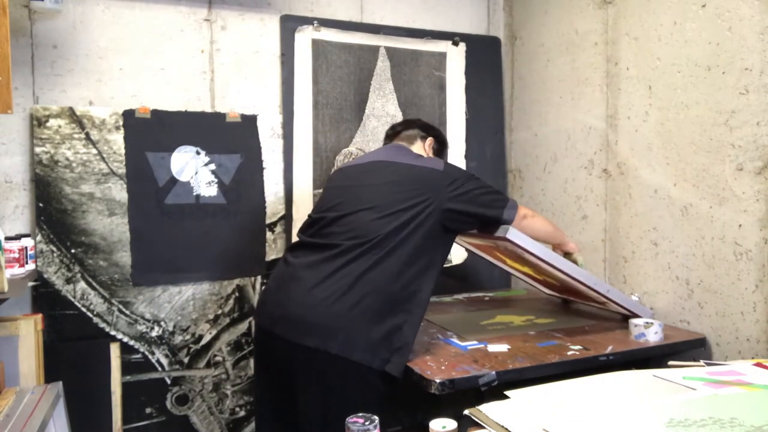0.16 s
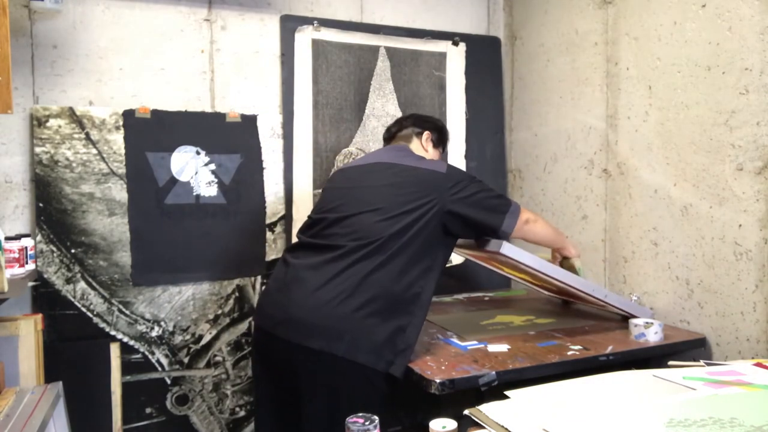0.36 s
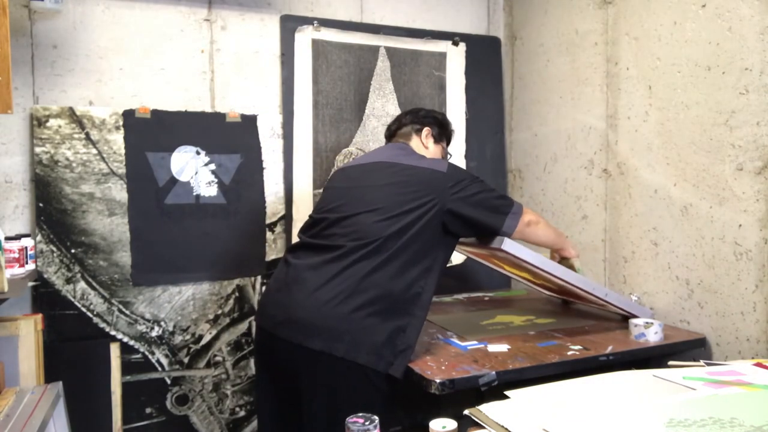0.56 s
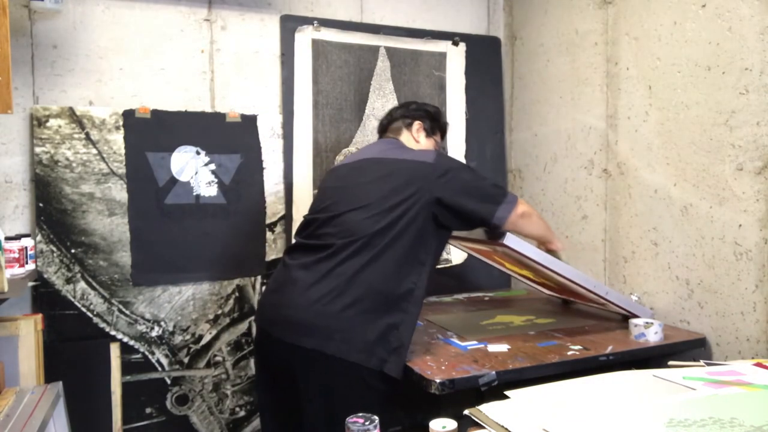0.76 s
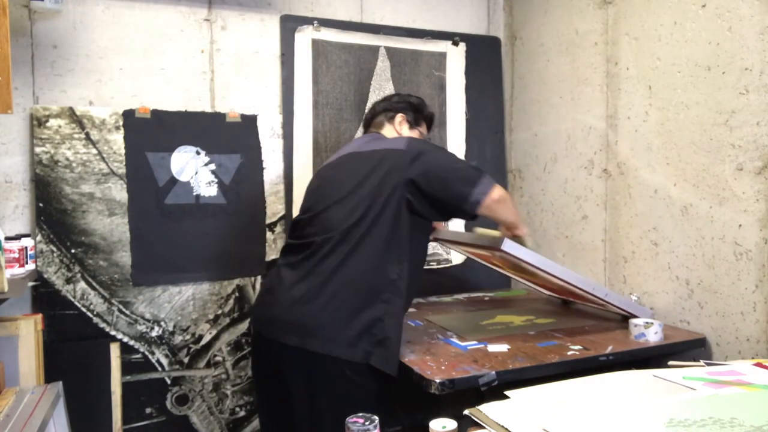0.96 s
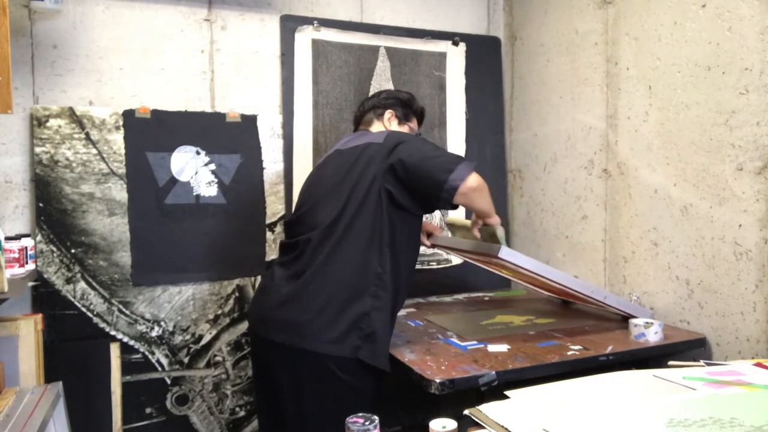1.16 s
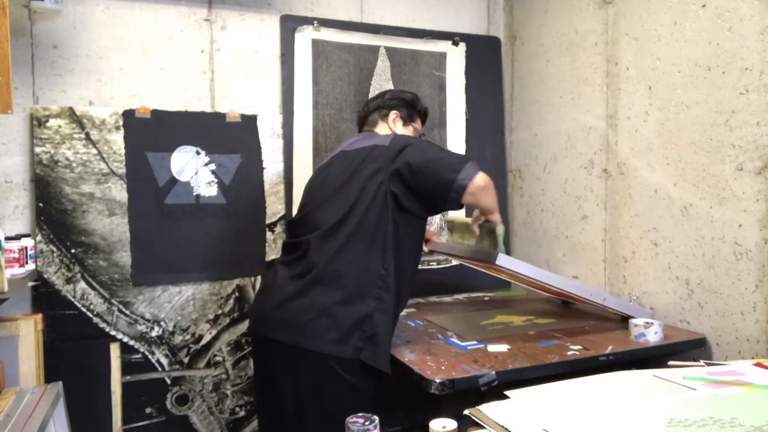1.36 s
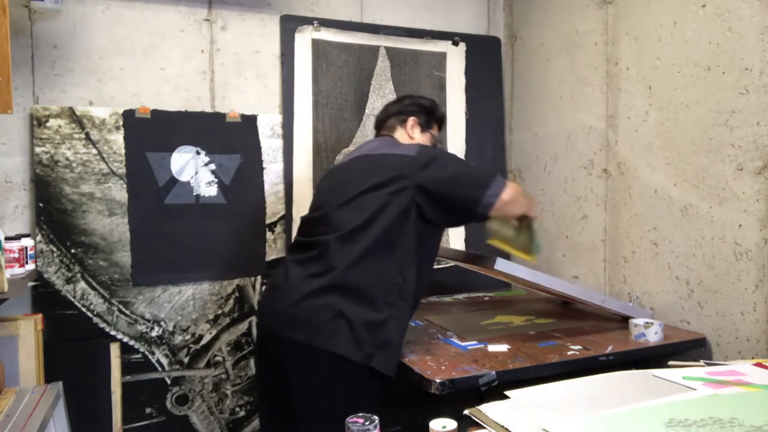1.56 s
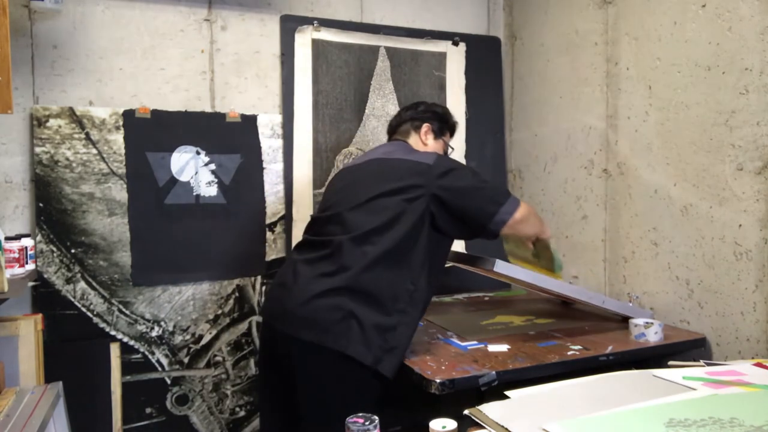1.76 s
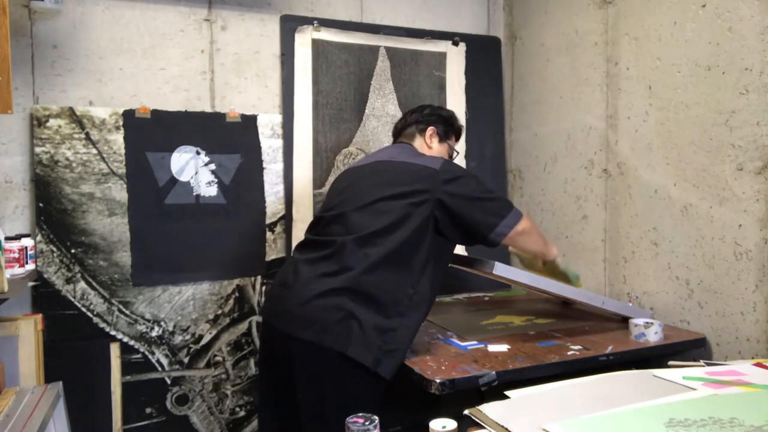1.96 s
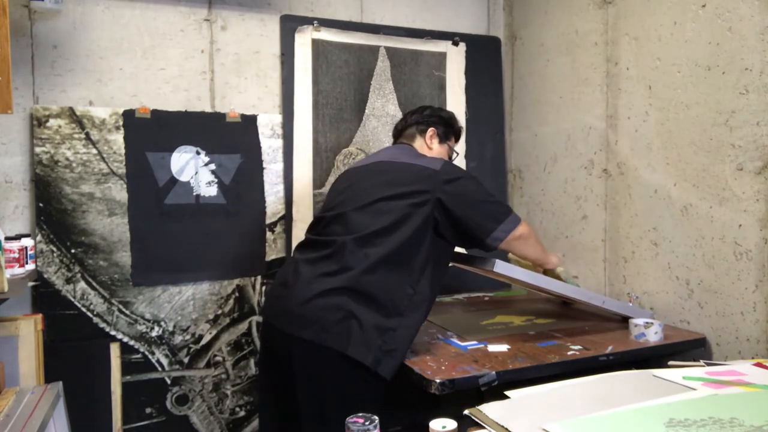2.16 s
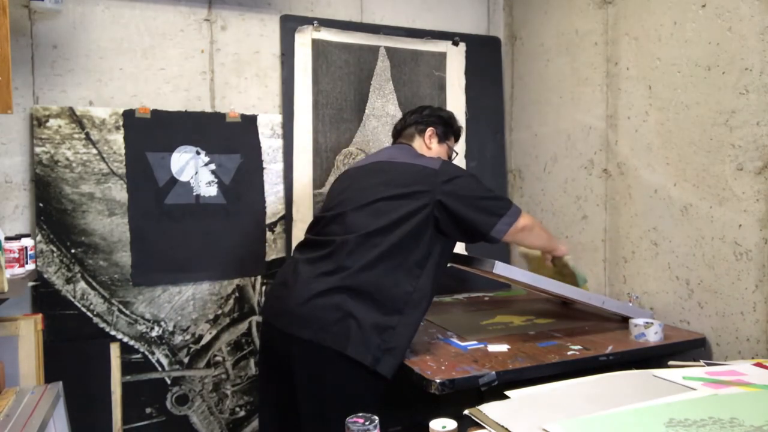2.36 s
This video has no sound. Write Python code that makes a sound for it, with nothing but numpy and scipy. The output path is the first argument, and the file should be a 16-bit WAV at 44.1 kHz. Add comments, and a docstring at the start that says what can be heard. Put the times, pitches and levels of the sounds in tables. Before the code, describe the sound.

A squeegee scrapes once across a printing screen, then two loud wooden knocks follow.

```python
"""A low mains hum hangs in a small concrete studio. After a small click, a squeegee is drawn
once across a printing screen: the blade hisses and scuffs over the taut mesh, and the weave
sings a rough note that rises and falls with the blade's speed. The stroke fades away.
Then the squeegee is set down against the frame with two loud wooden knocks,
each a crack of contact, a ring of the frame and a thump of the table."""
import sys
import numpy as np
from scipy import signal
from scipy.fft import rfft, irfft
from scipy.io import wavfile

SR = 44100
rng = np.random.default_rng(int(sys.argv[2]) if len(sys.argv) > 2 else 0)


def output_pcm(signal):
    """Save a mono or channel-first signal as 16-bit PCM at the path in sys.argv[1].

    Samples are clipped to [-1, 1] before scaling.
    """
    pcm = np.clip(np.atleast_2d(signal).T, -1, 1) * 32767
    wavfile.write(sys.argv[1], SR, np.round(pcm).astype(np.int16))


N = 105840
T = np.arange(N) / SR
HZ = np.maximum(np.arange(N // 2 + 1) * SR / N, 1)
AGE = np.arange(SR // 2) / SR   # seconds since an event
ROOM_BUILD_S = 0.0041   # attack of the room's reverb


def from_db(db):
    """Decibels to gain."""
    return 10 ** (np.asarray(db) / 20)


def rms_one(x):
    """Scale to unit level."""
    return x / np.sqrt(np.mean(x ** 2) + 1e-20)


def in_time(rows):
    """A control curve at every sample."""
    return np.interp(T, *np.transpose(rows))


def at_hz(points, hz):
    """Read a table on a log-frequency axis."""
    freqs, values = np.transpose(points)
    return np.interp(np.log(hz), np.log(freqs), values)


def noise(gain, size=N):
    """Unit noise with the given gain at each frequency."""
    gain = np.interp(np.arange(size // 2 + 1) * SR / size, HZ, gain)
    return rms_one(irfft(rfft(rng.standard_normal(size)) * gain, size))


def coloured(points):
    """Unit noise shaped by an EQ curve in dB."""
    return noise(from_db(at_hz(points, HZ)))


def drift(rate):
    """A smooth random wobble of unit level, mostly slower than `rate` Hz."""
    pole = np.exp(-2 * np.pi * rate * 8 / SR)
    white = rng.standard_normal(N // 8 + 2002)
    slow = signal.lfilter([1], [1, -2 * pole, pole * pole], white)[2000:]
    return np.interp(np.arange(N) / 8, np.arange(len(slow)), rms_one(slow))


def envelope(attack, t60, hold=0):
    """Straight attack, hold, exponential release."""
    release = np.exp(-np.log(1000) * np.maximum(AGE - attack - hold, 0) / t60)
    return np.clip(AGE / attack, 0, 1) * release


def mode(hz, t60, attack):
    """One dying sine."""
    return envelope(attack, t60) * np.sin(2 * np.pi * hz * AGE)


def placed(events):
    """Lay (start in seconds, sound) pairs on the timeline."""
    out = np.zeros(N + SR)
    for start, sound in events:
        out[int(start * SR):int(start * SR) + len(sound)] += sound
    return out[:N]


# The hum's partials. Each row: frequency in Hz, level in dB.
HUM_PARTIALS = [(59.4, -58.5), (119.8, -57.5), (178.5, -66), (239.2, -62.5), (294.8, -59), (355, -71),
                (1001.8, -74), (1473, -78)]
# Room tone EQ. Each row: frequency in Hz, gain in dB.
AIR_EQ = [(20, -8), (32, -19), (44, -12.5), (60, -24.5), (90, -3), (150, -7), (205, -12.5), (275, -6.5),
          (330, -7.5), (400, -10.5), (600, -12), (1000, -17), (1250, -18), (2000, -22.5), (3600, -25.5),
          (5000, -32.5), (9000, -36), (15500, -44.5)]
AIR_DB, HUM_WAVER_DB = -58, 1.8

def studio():
    """The bed: room air and a wavering mains hum."""
    hum = sum(from_db(db + HUM_WAVER_DB * drift(2.2)) * np.sin(2 * np.pi * (hz * T + rng.random()))
              for hz, db in HUM_PARTIALS)
    return np.sqrt(2) * hum + from_db(AIR_DB) * coloured(AIR_EQ)


# The rustle's fader. Each row: time in seconds, level in dB.
RUSTLE_FADER = [(0, -56.5), (.06, -59), (.15, -66), (.25, -63.5), (.36, -80)]
# Its EQ. Each row: frequency in Hz, gain in dB.
RUSTLE_EQ = [(500, 3), (1500, 0.5), (4000, -2), (9000, -8), (15000, -18)]

def handling():
    """A faint rustle of handling, gone when the stroke begins."""
    return coloured(RUSTLE_EQ) * from_db(in_time(RUSTLE_FADER)) * (T < RUB_FADER[0][0])


# The blade's catches. Each row: start in seconds, hold in seconds, release T60 in seconds,
# level in dB, centre in Hz, width in Hz.
SCUFF_CUES = [(.183, 0.018, 0.35, -47, 432, 106), (.604, 0.011, 0.18, -40, 2150, 330),
              (.605, 0.012, 0.12, -51.5, 4070, 550), (0.594, 0.013, 0.33, -46.5, 805, 137),
              (0.605, 0.01, 0.26, -44.5, 1410, 700), (0.619, 0.0084, 0.53, -44, 292, 130),
              (0.712, 0.027, 0.21, -52, 1550, 200), (.895, 0.05, 0.21, -49.5, 860, 448.7),
              (0.989, 0.044, 0.067, -44, 230, 88.4), (1.038, .05, 0.31, -56, 9500, 900),
              (1.139, .02, 0.097, -56, 3800, 603), (1.196, 0.016, 0.53, -45, 336, 165),
              (1.261, 0.02, 0.13, -56.5, 3700, 500), (1.375, 0.013, 0.13, -57, 820, 500),
              (2.182, 0.026, 0.11, -61, 7000, 5030), (2.191, .014, .15, -49.5, 2440, 1010)]

def scuffs(attack=0.0026):
    """Short resonant rasps where the blade grips."""
    rasps = []
    for start, hold, t60, db, hz, width in SCUFF_CUES:
        band = noise(1 / (1 + ((HZ - hz) / (width * 0.55)) ** 2), size=len(AGE))
        rasps.append((start, from_db(db) * envelope(attack, t60, hold) * band))
    return placed(rasps)


# The rubbing hiss's fader. Each row: time in seconds, level in dB.
RUB_FADER = [(.45, -88), (.49, -59.5), (.58, -53.5), (.64, -50), (.8, -45), (.94, -43.5), (1.06, -44.5),
             (1.12, -48), (1.17, -49.5), (1.215, -55), (1.28, -53.5), (1.34, -56.5), (1.39, -60),
             (1.44, -70), (1.5, -93)]
# EQs of the hiss and of the mesh as a drumhead. Each row: frequency in Hz, gain in dB.
RUB_EQ = [(300, -17), (520, -6.5), (800, -4), (1100, -5.5), (1400, -4.5), (2100, -4.5), (2700, -1.5),
          (3800, -2.5), (5000, -9.5), (6000, -7.5), (8500, -12.5), (10500, -17), (13000, -21.5),
          (15500, -27)]
DRUM_EQ = [(120, -37), (200, -3), (290, -1), (390, -6), (520, -16.5), (900, -54)]
# Mesh resonances and dips. Each row: centre in Hz, width in Hz, gain in dB.
MESH_BANDS = [(1565, 92, 7), (1800, 130, 3.5), (3700, 600, -0.5), (6300, 900, -6), (7640, 450, 3),
              (9600, 800, 2), (11800, 600, 2)]
GRAIN_DB, GRAIN_PER_S = 0.37, 91
BRIGHT_ABOVE_HZ, BRIGHT_FOLLOWS = 7500, .15   # FOLLOWS: dB gained per dB of rubbing
DRUM_DB, DRUM_FOLLOWS, DRUM_WAVER_DB = -51, 0.46, 2.5

def rubbing():
    """The blade's grainy hiss, brighter as it rubs harder, over the low drumming of the mesh."""
    level_db = in_time(RUB_FADER)
    effort_db = level_db - level_db.max()
    mesh_db = sum(db / (1 + (2 * (HZ - hz) / width) ** 2) for hz, width, db in MESH_BANDS)
    hiss = noise(from_db(at_hz(RUB_EQ, HZ) + mesh_db)) * from_db(GRAIN_DB * drift(GRAIN_PER_S))
    hiss = signal.sosfilt(signal.butter(2, 450, "high", fs=SR, output="sos"), hiss)
    treble = irfft(rfft(hiss) / (1 + (BRIGHT_ABOVE_HZ / HZ) ** 4), N)
    hiss += treble * (from_db(BRIGHT_FOLLOWS * effort_db) - 1)
    drum = coloured(DRUM_EQ) * from_db(DRUM_DB + DRUM_FOLLOWS * effort_db + DRUM_WAVER_DB * drift(15))
    touching = np.clip((level_db - max(RUB_FADER[0][1], RUB_FADER[-1][1])) / 20, 0, 1)
    return touching * (from_db(level_db) * hiss + drum)


# The blade's speed. Each row: time in seconds, threads crossed per second.
BLADE_SPEED = [(.5, 1693), (.62, 2130), (.70, 2980), (.79, 4000), (.885, 4960), (1.04, 4950), (1.058, 3900),
               (1.11, 3050), (1.2, 2610)]
# The note's partials. Each row: pitch multiple, relative level in dB at full speed,
# width as a fraction of the partial's mean frequency.
WEAVE_PARTIALS = [(1, -3.5, 0.047), (.9, -18, 0.058), (1.52, -14.5, .03), (2, -12, 0.038), (2.4, -25, .03)]
# The note's fader. Each row: time in seconds, level in dB.
WEAVE_FADER = [(.6, -70), (.64, -53), (.67, -47), (.71, -42.5), (.82, -46.5), (.9, -46.5), (1.0, -48),
               (1.045, -51), (1.07, -43), (1.11, -48.5), (1.14, -68), (1.2, -80)]
BITE_POWER = 1.3   # all partials but the first grow with this power of the speed
SKEW_DB, SKEW_WIDTH, SKEW_HZ_PER_S = -5.5, 0.12, 20000
WEAVE_ROOM_DB, WEAVE_ROOM_T60_S = -0.5, 0.28

def weave():
    """The blade crosses the threads: a rough zip whose pitch is its speed, smeared by the room."""
    speed = in_time(BLADE_SPEED)
    phase = 2 * np.pi * np.cumsum(speed) / SR

    def partial(multiple, width):
        """A narrow noise band riding on a multiple of the pitch."""
        spread = width * multiple * speed.mean()
        angle = multiple * phase
        return rms_one(drift(spread) * np.cos(angle) + drift(spread) * np.sin(angle))

    bite = (speed / speed.max()) ** BITE_POWER
    note = sum(from_db(db) * partial(multiple, width) * (bite if k else 1)
               for k, (multiple, db, width) in enumerate(WEAVE_PARTIALS))
    # While the speed changes, the blade's ends run unevenly and the note spreads.
    skew = np.clip(np.abs(np.gradient(speed)) * SR / SKEW_HZ_PER_S, 0, 1)
    note += skew * from_db(SKEW_DB) * partial(0.94, SKEW_WIDTH)
    gate = (T > WEAVE_FADER[0][0]) & (T < WEAVE_FADER[-1][0])
    note *= from_db(in_time(WEAVE_FADER)) * gate
    room = rng.standard_normal(len(AGE)) * envelope(ROOM_BUILD_S, WEAVE_ROOM_T60_S)
    reverb = signal.fftconvolve(note, room / np.linalg.norm(room))[:N]
    wet = from_db(WEAVE_ROOM_DB)
    return (note + wet * reverb) / np.hypot(1, wet)


# Edge ticks. Each row: start in seconds, level in dB.
TICK_CUES = [(0.187, -56), (2.218, -42)]
# Their EQ. Each row: frequency in Hz, gain in dB.
TICK_EQ = [(2000, -16), (5000, 6), (9000, 4), (15500, -7)]

def ticks(t60=0.012):
    """Hard edges meet: a bright tip on the opening click and on the loudest knock."""
    snap = envelope(1 / SR, t60)
    return coloured(TICK_EQ) * placed((start, from_db(db) * snap) for start, db in TICK_CUES)


# The concrete room's decay. Each row: frequency in Hz, T60 in seconds.
ROOM_DECAY = [(150, 0.51), (500, 0.31), (1500, 0.26), (3500, 0.22), (8000, 0.21), (14000, 0.13)]

def room_burst(eq, starts, levels_db, direct_db, t60, attack):
    """A short noise burst at each start, with a room tail that dies band by band."""
    hits = list(zip(starts, from_db(levels_db)))
    spectrum, reverb = rfft(coloured(eq)), 0
    for k, (_, room_t60) in enumerate(ROOM_DECAY):
        band = at_hz([(row[0], j == k) for j, row in enumerate(ROOM_DECAY)], HZ)
        tail = envelope(ROOM_BUILD_S, room_t60)
        power = placed((start, (gain * tail) ** 2) for start, gain in hits)
        reverb += irfft(spectrum * band, N) * np.sqrt(power)
    direct = from_db(direct_db) * envelope(attack, t60)
    return reverb + coloured(eq) * placed((start, gain * direct) for start, gain in hits)


# The frame's modes. Each row: frequency in Hz, relative level in dB, T60 in seconds.
FRAME_MODES = [(220, -2, .3), (275, 0, .3), (334, -2, .32), (466, -7, .32), (523, -5, .26), (586, -3, .24),
               (619, -5, .2), (664, -5, .24), (697, -8, .22), (781, -2, .22), (899, -13, .24),
               (1131, -18, .24), (1289, -14, .22), (1636, -18, .22)]
MAIN_MODE_HZ, MAIN_MODE_T60_S = 376, 0.13
FLEX_S = 0.004027   # the frame takes this long to start moving

def frame_rings(ring_db, main_db, contact_hz):
    """One wooden ring per knock; a soft contact barely wakes the high modes."""
    rings = np.outer(from_db(main_db), mode(MAIN_MODE_HZ, MAIN_MODE_T60_S, FLEX_S))
    for k, (hz, db, t60) in enumerate(FRAME_MODES):
        scatter_db = rng.normal(0, 1, len(ring_db))
        strength = from_db(ring_db + db + scatter_db) / (1 + (hz / contact_hz) ** 4)
        rings += np.outer((-1) ** k * strength, mode(hz, t60, FLEX_S))
    return rings


# Hits on the frame, from light taps to the loud set-down. Each row: start in seconds, then levels
# in dB of frame ring, main mode, clatter, crack and thump, then contact brightness in Hz.
KNOCK_CUES = [(0.182, -49, -41, -62, -63.5, -57, 450), (.199, -43.5, -35.5, -62, -73, -55, 395),
              (1.026, -40, -46, -70, -80, -78, 315), (1.199, -43, -43, -61, -80, -76, 390),
              (2.001, -44.5, -61, -33.5, -49, -62, 2000), (2.010, -22.5, -21, -21.5, -44, -28.5, 3000),
              (2.188, -44, -35, -45.5, -59, -61, 900), (2.2111, -18.5, -6.5, -20, -24.5, -32.5, 2980),
              (2.250, -28.5, -14, -38, -60, -67, 1230)]
# EQs of the dense modes' clatter, the contact's crack and the table's thump.
# Each row: frequency in Hz, gain in dB.
CLATTER_EQ = [(120, -46), (150, 3), (190, 0.5), (350, 2.5), (410, -4.5), (435, -6), (500, 4), (620, -4),
              (790, -1), (1050, -11), (1270, -9), (2000, -17.5), (4000, -24.5), (6000, -33), (10000, -41),
              (15000, -54)]
CRACK_EQ = [(800, 3), (2000, -7), (2600, 3.5), (3300, 0), (4000, -6.5), (6000, -22.5), (9000, -24),
            (15000, -49)]
THUMP_EQ = [(15, -42), (28, -26), (48, -1), (64, 9), (80, 4.5), (95, 0.5), (120, -0.5), (170, -1.5),
            (400, -57)]
# The handle's short high modes. Each row: frequency in Hz, dB against the crack, T60 in seconds.
HANDLE_MODES = [(2420, -2, .035), (2690, -1, .03), (2950, -2, .025), (3240, 2, .045), (3390, 1, .025)]
RING_DELAY_S = 0.003035   # the low modes start after the crack

def knocks():
    """Each knock cracks, sets the handle and frame ringing and thumps the table."""
    starts, ring_db, main_db, clatter_db, crack_db, thump_db, contact_hz = np.transpose(KNOCK_CUES)
    clatter = room_burst(CLATTER_EQ, starts, clatter_db, direct_db=-15.5, t60=0.053, attack=FLEX_S)
    crack = room_burst(CRACK_EQ, starts, crack_db, direct_db=3.5, t60=0.015, attack=FLEX_S / 2)
    ping = sum(from_db(db) * mode(hz, t60, FLEX_S / 2) * rng.choice([-1, 1])
               for hz, db, t60 in HANDLE_MODES)
    handle = placed(zip(starts, np.outer(from_db(crack_db), ping)))
    frame = placed(zip(starts + RING_DELAY_S, frame_rings(ring_db, main_db, contact_hz)))
    thump_shapes = np.outer(from_db(thump_db), envelope(FLEX_S, t60=0.35))
    thump = coloured(THUMP_EQ) * placed(zip(starts, thump_shapes))
    return clatter + crack + handle + frame + thump


def scene():
    """The stroke, the knocks and the room, mixed to mono."""
    return (rubbing() + weave() + handling() + scuffs() + knocks() + ticks() + studio())[None]


CUTOFF_HZ = 15750

def record(dry):
    """A steep low-pass takes off the very top."""
    return signal.sosfilt(signal.ellip(12, .1, 90, CUTOFF_HZ, fs=SR, output="sos"), dry)


dry = scene()
out = record(dry)
output_pcm(out)
```